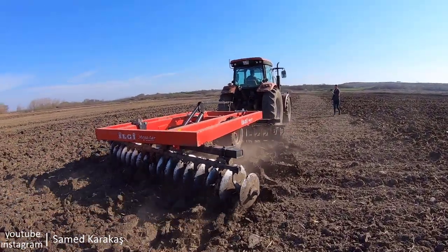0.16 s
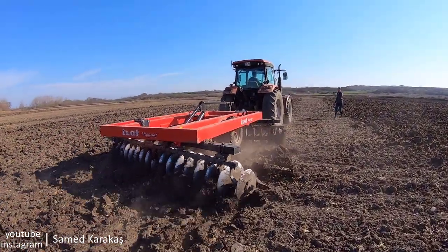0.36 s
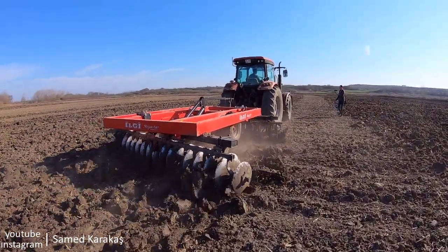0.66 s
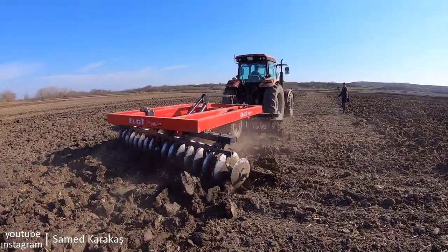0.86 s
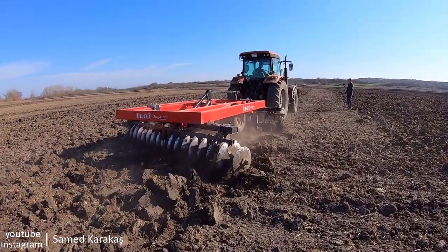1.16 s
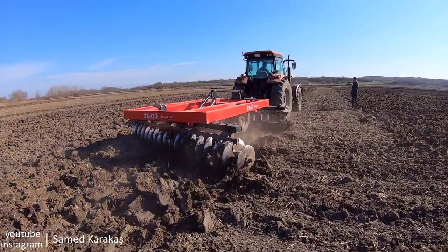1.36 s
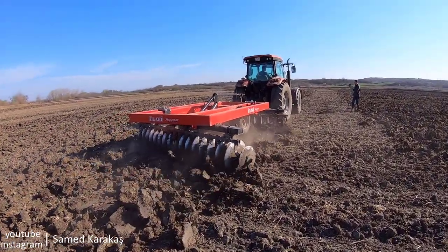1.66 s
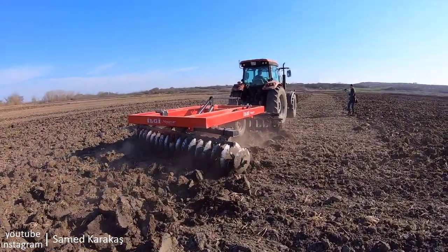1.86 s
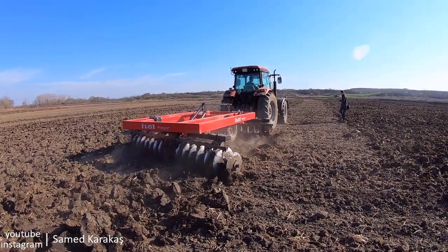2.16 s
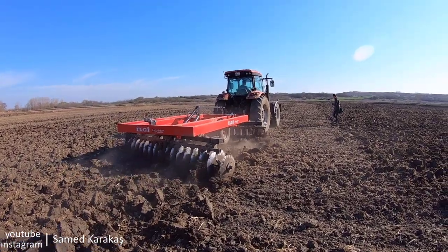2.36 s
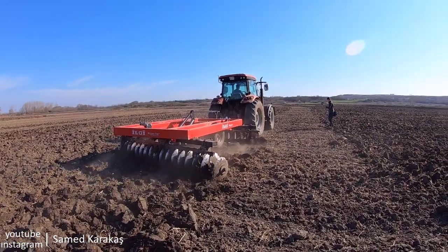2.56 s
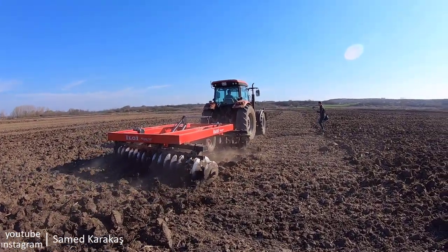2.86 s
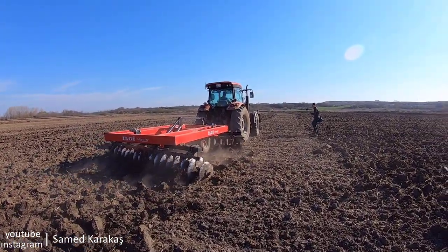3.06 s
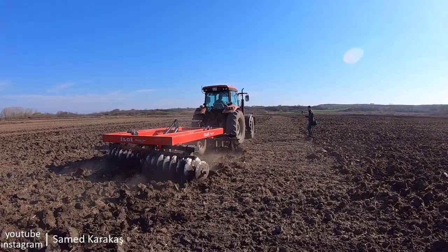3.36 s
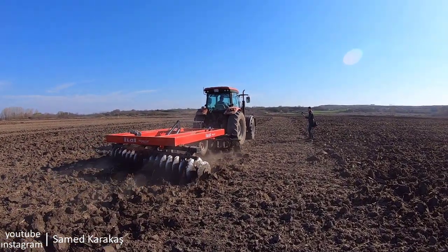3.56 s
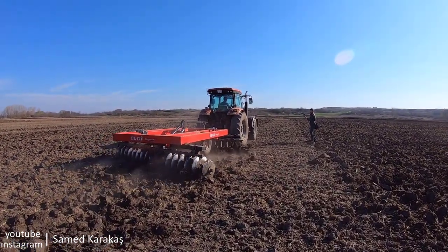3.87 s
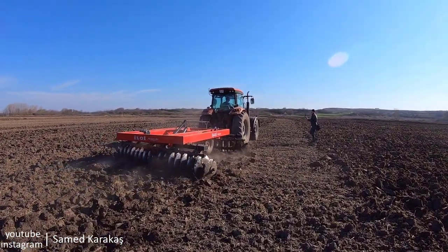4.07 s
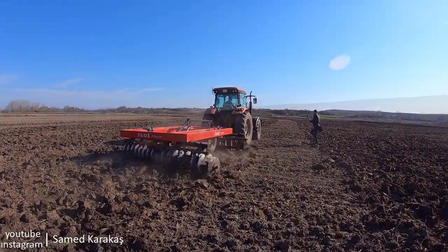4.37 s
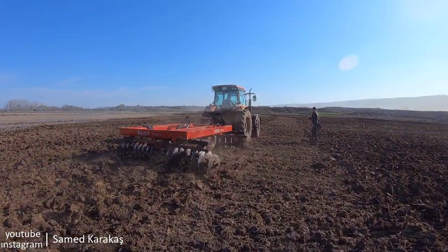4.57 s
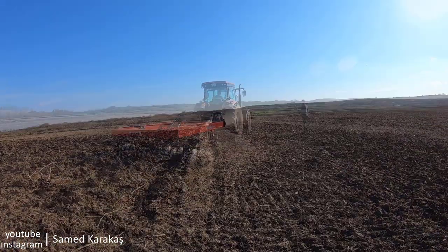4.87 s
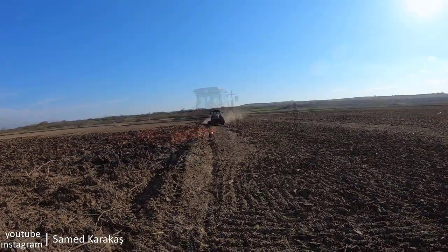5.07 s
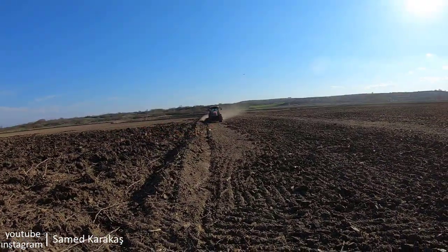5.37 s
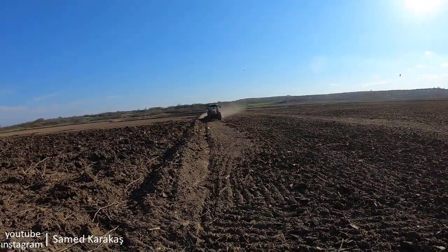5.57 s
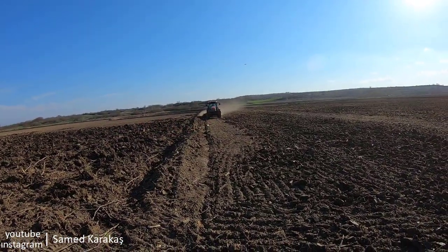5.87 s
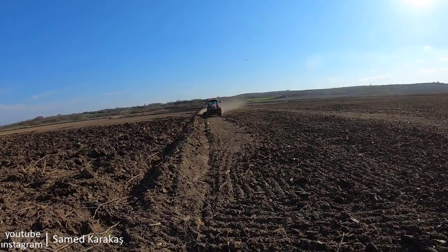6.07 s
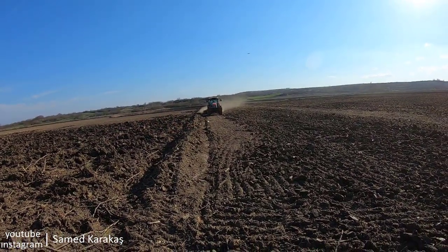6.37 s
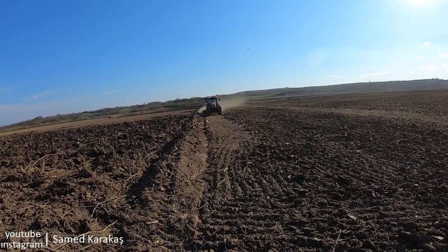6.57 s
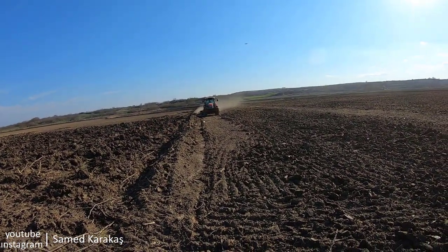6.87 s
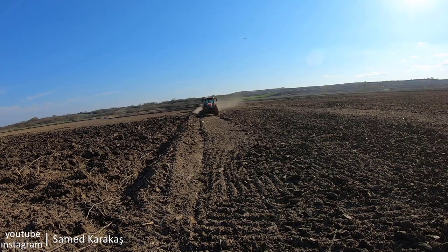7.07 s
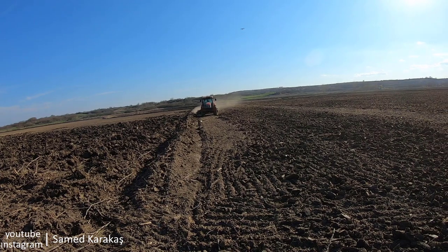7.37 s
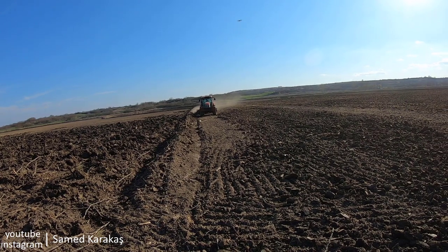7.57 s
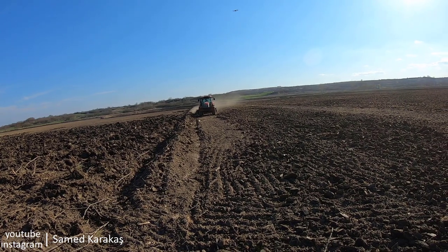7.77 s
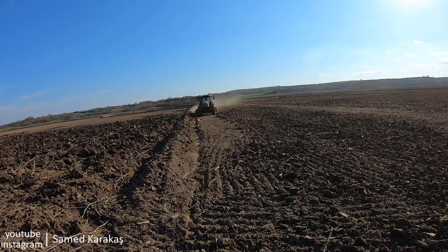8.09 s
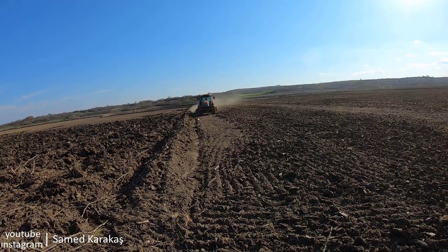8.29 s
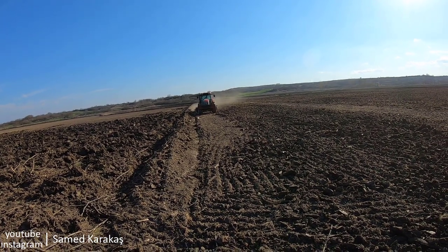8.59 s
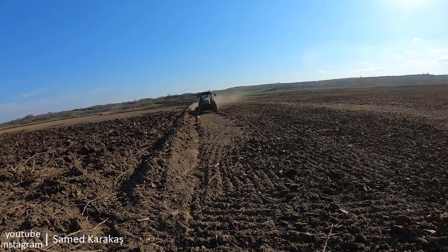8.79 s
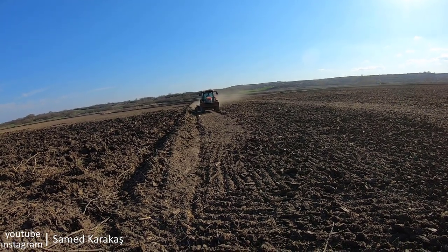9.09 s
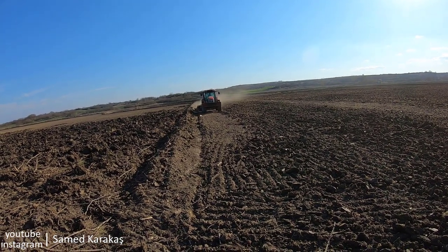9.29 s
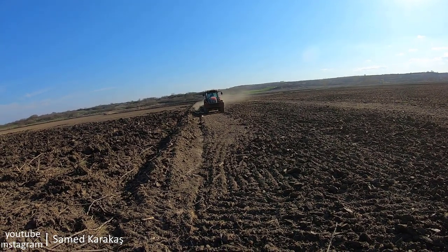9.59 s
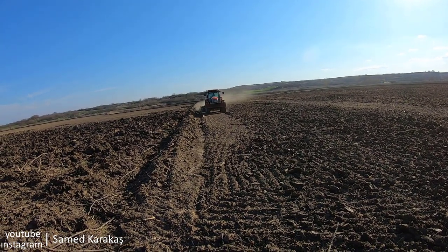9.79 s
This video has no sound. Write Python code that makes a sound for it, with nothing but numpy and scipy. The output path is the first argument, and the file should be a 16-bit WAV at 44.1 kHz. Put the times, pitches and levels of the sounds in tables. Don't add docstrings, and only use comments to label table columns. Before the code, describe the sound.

A wide, close diesel drone with deep rapid pulses, gritty disc and soil noise and thin gear tones briefly loses its punch twice, then breaks off with a small tick after a short squeal. After a tiny gap, a distant, slightly faster engine fades in quickly under hard wind buffets. Its narrow, dull sound has a shifting hollow ground echo, then opens into airy stereo with rustling clods close to the microphone.

```python
import sys
import numpy as np
from scipy import signal
from scipy.fft import rfft, irfft, next_fast_len
from scipy.io import wavfile
from scipy.ndimage import uniform_filter1d

SR = 44100
rng = np.random.default_rng(int(sys.argv[2]) if len(sys.argv) > 2 else 0)


def boost_factor(decibels):
    exponent = np.asarray(decibels, float) / 20
    return 10 ** exponent


def generate_wav(signal):
    frames = np.transpose(np.atleast_2d(signal))
    scaled = np.clip(frames, -1, 1) * 32767
    pcm = np.round(scaled).astype(np.int16)
    wavfile.write(sys.argv[1], SR, pcm)


N = 438354


def rms_one(x):
    return x / np.sqrt(np.mean(x ** 2) + 1e-20)


def in_time(rows):
    s, *columns = np.transpose(rows)
    return [np.interp(np.arange(N) / SR, s, c) for c in columns]


def ramp(start_s, length_s):
    return np.clip((np.arange(N) / SR - start_s) / length_s, 0, 1)


def bumps(rows):
    s = np.arange(N) / SR
    total_db = np.zeros(N)
    for at, rise, fall, db in rows:
        total_db += np.interp(s, [at - abs(rise), at, at + abs(fall)], [0, db, 0])
    return total_db


def sway(per_s, top_s):
    return np.cos(2 * np.pi * per_s * (np.arange(N) / SR - top_s))


def drift(rate):
    r = np.exp(-80 * np.pi * rate / SR)
    white = rng.standard_normal(N // 40 + 2002)
    slow = signal.lfilter([1], [1, -2 * r, r * r], white)[2000:]
    return np.interp(np.arange(N) / 40, np.arange(len(slow)), rms_one(slow))


def wavering_tone(hz, wobble, rate):
    return np.sin(2 * np.pi * np.cumsum(hz * (1 + wobble * drift(rate))) / SR)


def colour(x, points, panels=(), above_hz=1, below_hz=1e5):
    size = next_fast_len(len(x))
    hz = np.arange(size // 2 + 1) * SR / size + 1e-3
    point_hz, point_db = np.transpose(points)
    db = np.interp(np.log(hz), np.log(point_hz), point_db)
    for centre_hz, width_hz, top_db in panels:
        db = db + top_db / (1 + (2 * (hz - centre_hz) / width_hz) ** 2)
    edges = 1 / (1 + (above_hz / hz) ** 8) / (1 + (hz / below_hz) ** 8)
    return irfft(rfft(x, size) * boost_factor(db) * edges, size)[:len(x)]


# frequency in Hz, side over mid in dB.
PORT_WIND = [(25, 1.5), (45, -3), (90, -12.5), (200, -35.5)]


def rumble(level_db, points, lumpy_db):
    mid, side = [rms_one(colour(white, points)) for white in rng.standard_normal((2, N))]
    return boost_factor(level_db + lumpy_db * drift(11.0)) * np.array([mid, colour(side, PORT_WIND)])


# frequency in Hz, level in dB.
SOIL_RETURN = [(600, -14), (1500, -4), (2500, 0), (4500, -1), (7000, -5), (12000, -12)]
# time in seconds, lag in ms, strength from 0 to 1.
GROUND = [(5, .54, .75), (5.4, .545, .6), (6.3, .57, .45), (6.75, .62, .3), (7.15, .72, .5), (8, .8, .55),
          (9, .9, .3), (9.94, .97, .15)]


def ground_echo(x):
    lag_ms, strength = in_time(GROUND)
    returned = colour(x, SOIL_RETURN)
    late = np.interp(np.arange(N) - lag_ms * SR / 1000, np.arange(N), returned)
    return x - strength * late


def per_firing(turns, spread_db, odd_db):
    count = turns.astype(int)
    db = spread_db * rng.standard_normal(count[-1] + 1)[count] + odd_db * (count % 2 - .5)
    return uniform_filter1d(db, size=200)


# frequency in Hz, side over mid in dB.
SIDE_COLOUR = [(40, -37), (200, -26), (400, -36.5), (700, -16.5), (1000, -11.5), (2500, -12), (4000, -15),
               (6000, -4.5), (9500, 4), (12000, -4)]


def clatter(turns, levels, points, panels, throb_db, spread_db, grit, echo):
    flare = uniform_filter1d(np.exp(-1.8 * ((turns - .33) % 1)), size=90)
    throb = throb_db * rms_one(flare - flare.mean())
    pulse = boost_factor(throb + per_firing(turns - .33 + 1, spread_db, odd_db=-0.3))
    hits = rng.random((2, N)) < 900 / SR
    strength = boost_factor(2.17 * np.minimum(rng.exponential(1, (2, N)), 4))
    clods = hits * strength * rng.choice([-1, 1], (2, N))
    mid, side = (rng.standard_normal((2, N)) + grit * clods) * pulse
    if echo:
        mid = ground_echo(mid)
    side = colour(side, SIDE_COLOUR)
    out = np.zeros((2, N))
    edges = [220, 1500, 4500, 7500, 16000]
    for low, high, db in zip(edges, edges[1:], levels):
        band = colour(mid, points, panels, low, high)
        gain = boost_factor(db + .4 * drift(12)) / np.std(band)
        out += gain * np.array([band, colour(side, points, panels, low, high)])
    return out


# frequency in Hz, level in dB per Hz.
CRUMBLE_COLOUR = [(1500, -31), (3500, 3.5), (6000, -1), (9500, -5.5), (11500, -20.5), (14000, -43.5)]
# peak in seconds, rise in seconds, fall in seconds, level in dB.
SWELLS = [
    (8.955, .24, 0.16, 10.3),
    (9.22, 0.19, 0.039, 13.4),
    (9.93, 0.43, .05, 4.5),
]
CRUMBLE_DB = -61


def crumble():
    grains = rng.standard_normal((2, N)) * boost_factor(0.88 * drift(60))
    both = np.array([rms_one(colour(g, CRUMBLE_COLOUR)) for g in grains])
    return ramp(8.03, 0.63) * boost_factor(CRUMBLE_DB + bumps(SWELLS)) * both


def whistle(table):
    hz, db = in_time(table)
    tone = wavering_tone(hz, 0.0048, 16)
    return np.sqrt(2) * boost_factor(db + 2.8 * drift(8)) * tone * [[1], [0]]


SQUEAL_HZ, SQUEAL_SAG_HZ, SQUEAL_LOWEST_S, SQUEAL_SAG_S = 830, 22, 4.61, .17
SQUEAL_DB, SQUEAL_GROWTH_DB = -42, 10.5


def squeal():
    s = np.arange(N) / SR
    hz = SQUEAL_HZ - SQUEAL_SAG_HZ * np.exp(-((s - SQUEAL_LOWEST_S) / SQUEAL_SAG_S) ** 2)
    tone = wavering_tone(hz, 0.0032, 25)
    db = SQUEAL_DB + SQUEAL_GROWTH_DB * np.clip(s - 4.3, -.1, .4)
    return np.sqrt(2) * boost_factor(db + 2.4 * drift(17)) * ramp(4.195, 0.35) * tone * [[1], [-.2]]


# ratio to the main whine, level over it in dB, right over left in dB,
# wobble as a share of pitch.
WHINES = [(.562, -1.5, 1, .003), (1, 2, 5, .002), (.94, -7, 4, .004), (1.207, 2.5, 2, .002),
          (1.75, -3.5, 1, .004), (3, -10, 0, .002), (2.6, -11, 0, .002)]


def whines(gear_hz, gear_db):
    out = np.zeros((2, N))
    for ratio, db, right_db, wobble in WHINES:
        tone = wavering_tone(ratio * gear_hz, wobble, 12.6)
        lean = (1 - boost_factor(right_db)) / (1 + boost_factor(right_db))
        out += np.sqrt(2) * boost_factor(gear_db + db + 1.8 * drift(3)) * tone * [[1], [lean]]
    return out


HUNTING, HUNTING_PER_S = 0.00397, 4.002
ROCKING_PER_S, ROCKING_TOP_S = 1.9, 7.42


def engine(table, rocking):
    firing_hz, load_db = in_time(table)
    unrest = HUNTING * drift(HUNTING_PER_S) + rocking * sway(ROCKING_PER_S, ROCKING_TOP_S)
    firing_hz = firing_hz * (1 + unrest)
    return firing_hz, np.cumsum(firing_hz) / SR, load_db


def exhaust(turns, first_db, second_db, orders, bend, lean, spread_db):
    phase = 2 * np.pi * (turns - .5)
    out = boost_factor(first_db) * np.cos(phase) + boost_factor(second_db) * np.cos(2 * phase + bend)
    for multiple, db in orders:
        wander = (0.18 + 4.9 * (multiple % 1)) * drift(2.8)
        order_phase = multiple * phase + bend + lean * (multiple - 2) + wander
        out += boost_factor(second_db + db + 1.7 * drift(2.4)) * np.cos(order_phase)
    return -np.sqrt(2) * out * boost_factor(per_firing(turns, spread_db, odd_db=-0.5))


def port_mismatch(x, corner_hz):
    leak = np.exp(-2 * np.pi * 12 / SR)
    integral = signal.lfilter([2 * np.pi * corner_hz / SR], [1, -leak], x)
    return np.array([x, integral - .022 * x])


FLICKER_DB = 0.73
SECOND_FOLLOWS = 1.6

# time in seconds, firings in Hz, load in dB.
ENGINE_NEAR = [(0, 51.84, .5), (.27, 56.12, 0.4), (.65, 56.66, -0.1), (1.25, 55.39, 0.1),
               (2.6, 54.62, -0.1), (3.25, 54.94, 0.8), (3.9, 55.76, -0.1), (4.15, 56.95, -1),
               (4.32, 54.44, -2), (4.79, 53.9, -0.7)]
# multiple of the firing rate, level over the second order in dB.
ORDERS_NEAR = [(.5, -34), (1.5, -24), (3, -15), (3.5, -19), (7, -25)]
# peak in seconds, rise in seconds, fall in seconds, level in dB.
LURCHES = [
    (1.13, .14, .1, -15),
    (1.32, .1, .6, 2.5),
    (2.3, .06, .3, -4),
    (2.95, .35, .1, -3),
    (3.11, .1, .08, -14),
    (4.25, .17, .15, -6),
]
# level in dB, loss in dB per second, share of load.
CLATTER_NEAR = [
    (-34, 0.38, .6),
    (-42.5, 0.3, .7),
    (-57, 0.7, .8),
    (-67.5, 0.25, .9),
]
# frequency in Hz, level in dB per Hz.
COLOUR_NEAR = [(150, -20), (260, -11.5), (385, -1.5), (600, -11), (1010, -10.5), (1430, -18.5),
               (2210, -16.5), (3200, -16.5), (4470, -26.5), (7000, -33), (10000, -40.5), (11000, -51),
               (12500, -50), (14200, -70)]
# centre in Hz, width in Hz, level in dB.
PANELS_NEAR = [(370, 56, -3), (1117, 88, -6.5), (1316, 72, 5.5), (1713, 440, 5), (2970, 160, -1),
               (8000, 1000, -3.5)]
# frequency in Hz, level in dB per Hz.
RUMBLE_COLOUR_NEAR = [(20, -29), (35, -22), (80, 0), (140, 3), (200, -3.5), (250, -9), (400, -32.5),
                      (900, -110)]
# time in seconds, pitch in Hz, level in dB.
WHISTLE = [(1.05, 3690, -80), (1.25, 3690, -57), (1.45, 3680, -56), (1.75, 3620, -58), (1.95, 3600, -80)]
PIPE_NEAR_DB = (-26.5, -28)
RUMBLE_NEAR_DB = -34.5
GEAR_TEETH, GEAR_DB, GEAR_FOLLOWS = 18.7, -51, 2.6
GEAR_SWAY, GEAR_SWAY_PER_S, GEAR_SWAY_TOP_S = .009, 2.17, 2.5


def near_shot():
    firing_hz, turns, load_db = engine(ENGINE_NEAR, rocking=0)
    first_db = PIPE_NEAR_DB[0] + load_db + FLICKER_DB * drift(4.9)
    second_db = PIPE_NEAR_DB[1] + SECOND_FOLLOWS * load_db + bumps(LURCHES) + FLICKER_DB * drift(9.1)
    pipe = exhaust(turns, first_db, second_db, ORDERS_NEAR, bend=-.8, lean=.9, spread_db=.9)
    s = np.arange(N) / SR
    levels = [db - loss_db * s + share * load_db for db, loss_db, share in CLATTER_NEAR]
    noise = clatter(turns, levels, COLOUR_NEAR, PANELS_NEAR,
                    throb_db=1.0, spread_db=0.75, grit=1.2, echo=False)
    noise[1] -= 0.24 * colour(noise[0], [(300, -10.5), (900, 1.5), (2500, -8.5), (5000, -20.5)])
    low = rumble(RUMBLE_NEAR_DB, RUMBLE_COLOUR_NEAR, lumpy_db=1.2)
    pull = 1 + GEAR_SWAY * sway(GEAR_SWAY_PER_S, GEAR_SWAY_TOP_S)
    gears = whines(GEAR_TEETH * firing_hz * pull, GEAR_DB + GEAR_FOLLOWS * load_db)
    return port_mismatch(pipe, corner_hz=5.6) + noise + low + gears + squeal() + whistle(WHISTLE)


# time in seconds, firings in Hz, load in dB.
ENGINE_FAR = [(5.3, 59.7, 0.59), (6.25, 60.86, -0.13), (6.55, 60.04, -0.2), (6.78, 58.63, 0.14),
              (7.2, 59.7, 0.6), (8.2, 58.86, -0.65), (8.8, 60.04, -0.68), (9.93, 60, -0.91)]
# multiple of the firing rate, level over the second order in dB.
ORDERS_FAR = [(.5, -26), (3, -9), (3.5, -20), (4, -18), (7, -23)]
# time in seconds, gain in dB.
CLAMP = [
    (5.0, -3),
    (5.2, -5.5),
    (5.28, -10),
    (5.64, -3.5),
    (5.71, -0.7),
    (5.9, 1.2),
]
# peak in seconds, rise in seconds, fall in seconds, level in dB.
OVERSHOOT = [
    (5.78, 0.63, 0.42, 2.5),
]
# peak in seconds, rise in seconds, fall in seconds, level in dB.
GUSTS = [
    (5.11, 0.059, 0.049, 15.5),
    (5.185, 0.034, 0.089, 15.5),
    (5.71, 0.065, 0.17, 7),
    (6.24, .05, .06, 3),
    (7.11, .1, 0.066, 2),
]
# level in dB, missing at the entry in dB, gain as the wind filter lets go in dB.
CLATTER_FAR = [
    (-37, 3, 0.8),
    (-43.5, 9.5, 2.1),
    (-62.5, 15, 7),
    (-82, 8, 9.5),
]
# frequency in Hz, level in dB per Hz.
COLOUR_FAR = [(150, -35.5), (260, -7.5), (409, -4.5), (815, -7), (1190, -9), (1730, -12.5), (3200, -19),
              (4470, -26.5), (6000, -40.5), (8000, -43), (9500, -54.5), (11500, -63.5), (14000, -73)]
# centre in Hz, width in Hz, level in dB.
PEAKS_FAR = [(405, 60, 3), (570, 100, -8), (700, 90, 7.5), (860, 90, -4), (1020, 110, 6), (1250, 140, -6),
             (1450, 150, 4), (1650, 90, -6), (2300, 120, 2), (2600, 110, 4), (2760, 80, -3),
             (2900, 90, 4.5), (3080, 90, -3), (3230, 120, 4), (3550, 120, 2), (3850, 120, 3),
             (4050, 100, -3)]
# frequency in Hz, level in dB per Hz.
RUMBLE_COLOUR_FAR = [(15, -11.5), (30, -2.5), (80, -3.5), (140, -1.5), (230, -4), (280, -16.5),
                     (400, -19.5), (900, -110)]
# time in seconds, pitch in Hz, level in dB.
FAR_WHISTLE = [(6.1, 2900, -75), (6.35, 2900, -51), (6.8, 2880, -54), (7.2, 2850, -56), (7.4, 2840, -80)]
PIPE_FAR_DB = (-27.5, -30)
RUMBLE_FAR_DB = -35
ROCKING = 0.0069
CLAMP_ON_SECOND, CLAMP_ON_BODY = .75, .3
ENTRY_S, SETTLE_S, OPEN_S, OPEN_LENGTH_S = 4.93, 0.45, 7.73, 0.88


def far_shot():
    firing_hz, turns, load_db = engine(ENGINE_FAR, ROCKING)
    clamp_db = in_time(CLAMP)[0]
    first_db = PIPE_FAR_DB[0] + load_db + clamp_db + FLICKER_DB * drift(2.2)
    second_db = PIPE_FAR_DB[1] + SECOND_FOLLOWS * load_db
    second_db = second_db + CLAMP_ON_SECOND * clamp_db + FLICKER_DB * drift(3.8)
    pipe = exhaust(turns, first_db, second_db, ORDERS_FAR, bend=0, lean=.9, spread_db=.9)
    unsettled = 1 - ramp(ENTRY_S, SETTLE_S)
    opened = ramp(OPEN_S, OPEN_LENGTH_S)
    swing_db = .6 * load_db + bumps(OVERSHOOT)
    levels = [db - entry_db * unsettled + open_db * opened + swing_db for db, entry_db, open_db in CLATTER_FAR]
    levels[0] = levels[0] + CLAMP_ON_BODY * clamp_db
    noise = clatter(turns, levels, COLOUR_FAR, PEAKS_FAR,
                    throb_db=1.93, spread_db=0.9, grit=0.99, echo=True)
    low = rumble(RUMBLE_FAR_DB + clamp_db + bumps(GUSTS), RUMBLE_COLOUR_FAR, lumpy_db=2.0)
    return port_mismatch(pipe, corner_hz=3.2) + noise + low + crumble() + whistle(FAR_WHISTLE)


# time in seconds, side gain in dB.
WIDTH = [
    (0, -1),
    (4.8, -2.5),
    (4.9, -68.5),
    (7.7, -66),
    (7.85, -14),
    (8.2, -10),
    (8.8, -2),
    (9.94, -1),
]
CUT_S, FADE_IN_S, FADE_LENGTH_S = 4.7998, 4.988, .075
CUT_TICK_DB = -30.5


def scene():
    s = np.arange(N) / SR
    cut = np.clip((CUT_S - s) / .0003, 0, 1) ** .5
    fade = np.clip((s - FADE_IN_S) / FADE_LENGTH_S, 0, 1) ** 2
    mid, side = near_shot() * cut + far_shot() * fade
    mid[int(CUT_S * SR)] += boost_factor(CUT_TICK_DB)
    side = side * boost_factor(in_time(WIDTH)[0])
    return np.array([mid + side, mid - side])


def roll_off(x):
    return signal.sosfilt(signal.butter(12, 15500, fs=SR, output="sos"), x)


def record(dry):
    rounded = .45 * np.tanh(dry / .45)
    return roll_off(rounded)


dry = scene()
out = record(dry)
generate_wav(out)
```